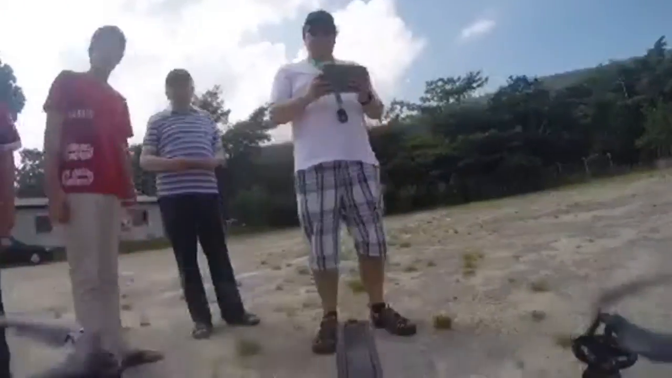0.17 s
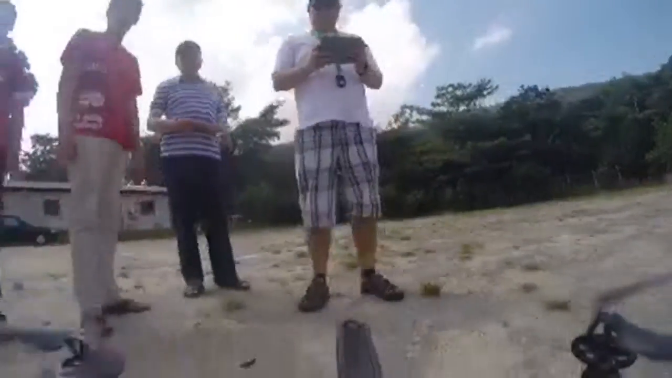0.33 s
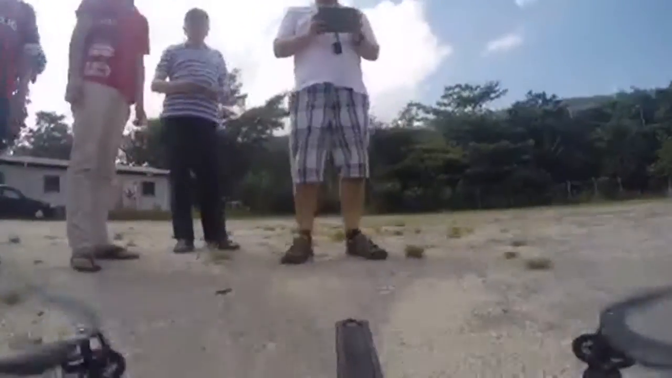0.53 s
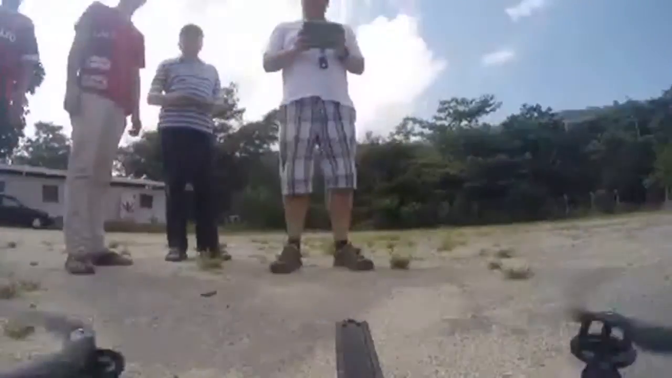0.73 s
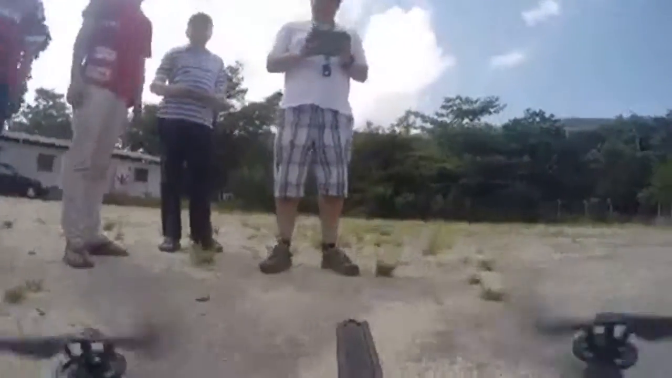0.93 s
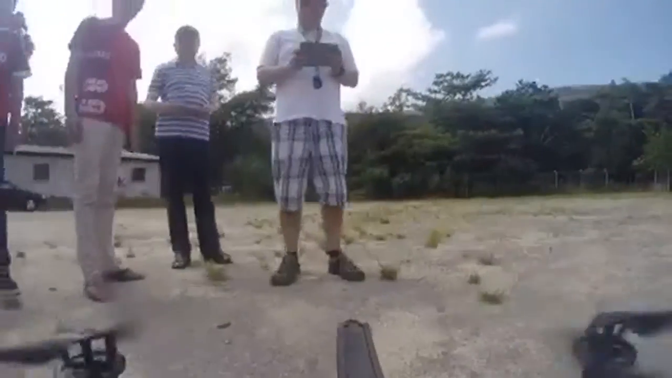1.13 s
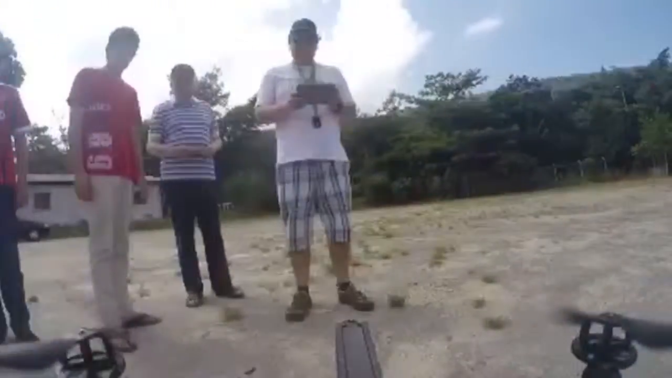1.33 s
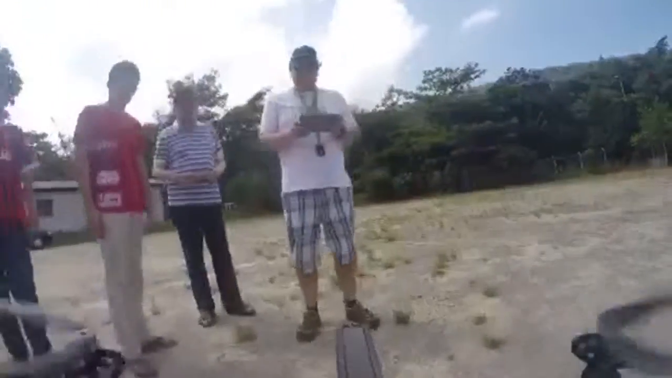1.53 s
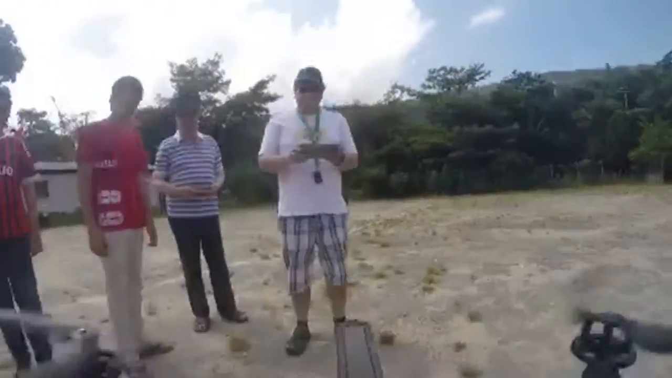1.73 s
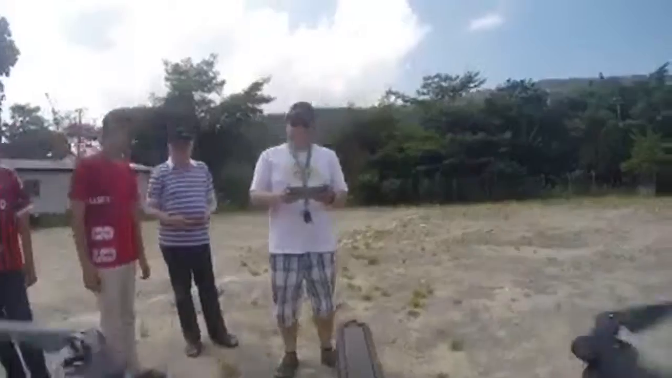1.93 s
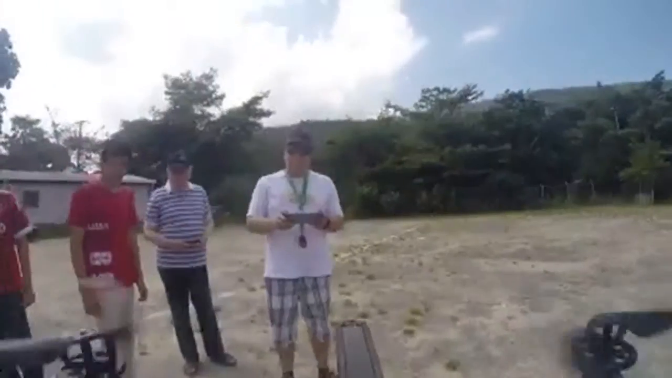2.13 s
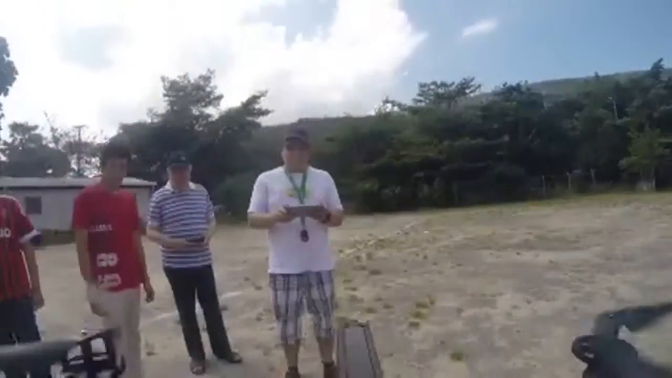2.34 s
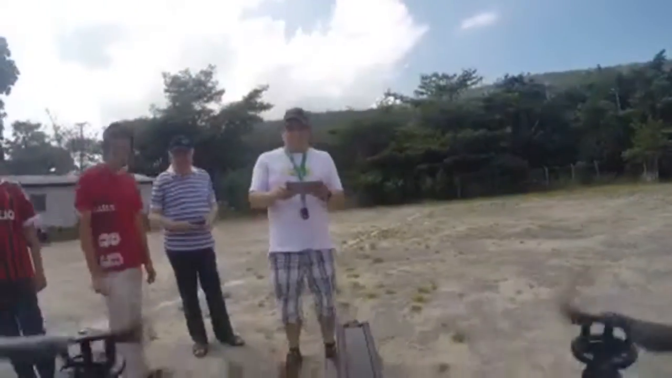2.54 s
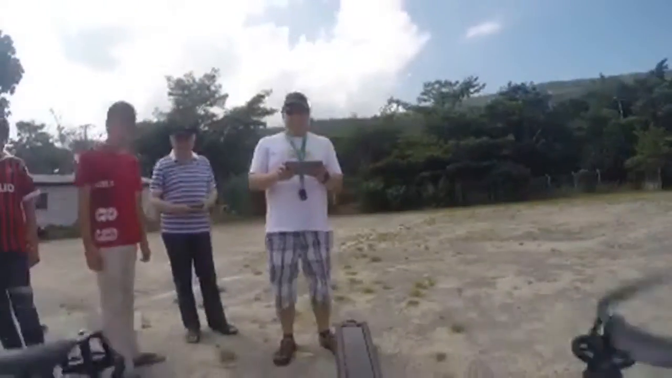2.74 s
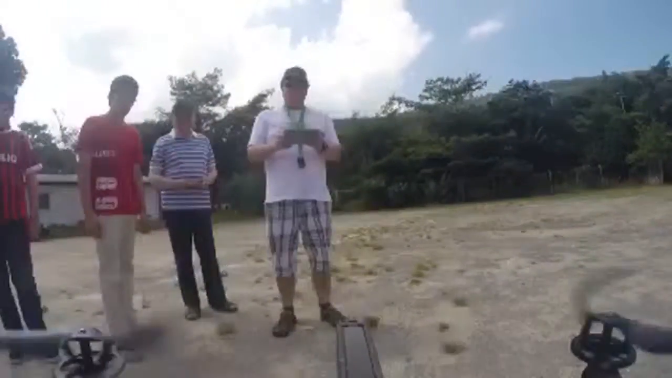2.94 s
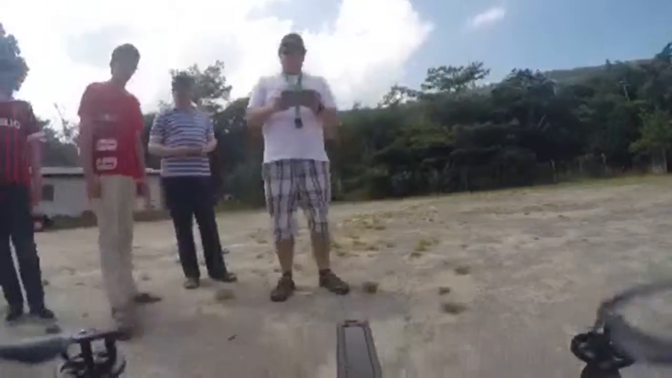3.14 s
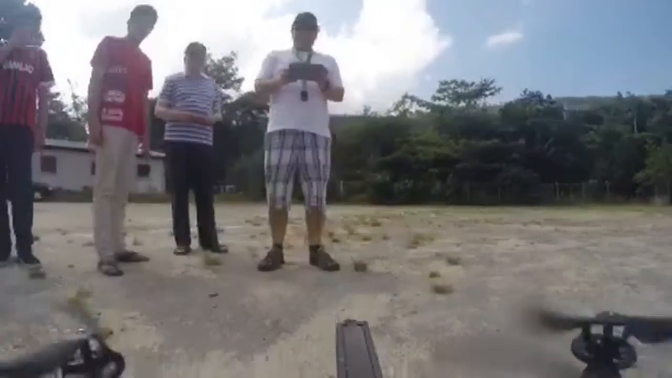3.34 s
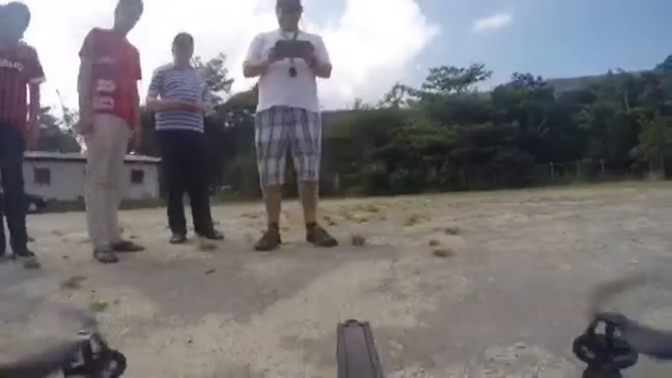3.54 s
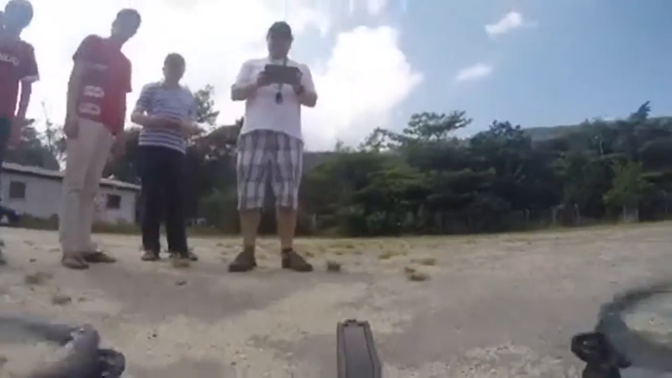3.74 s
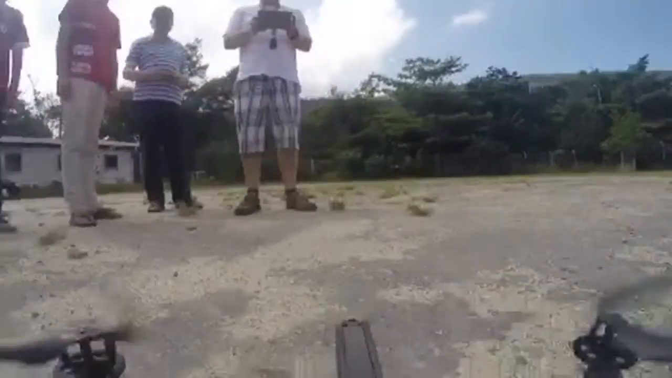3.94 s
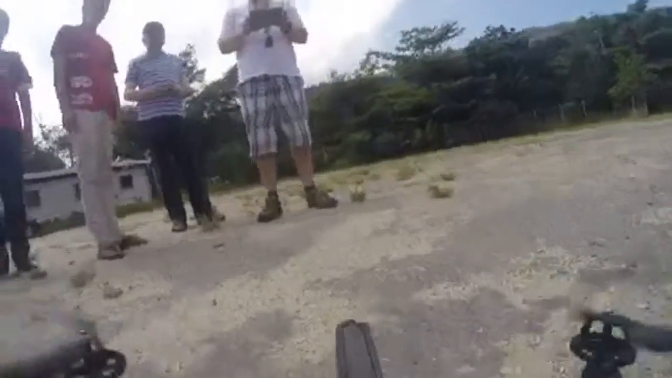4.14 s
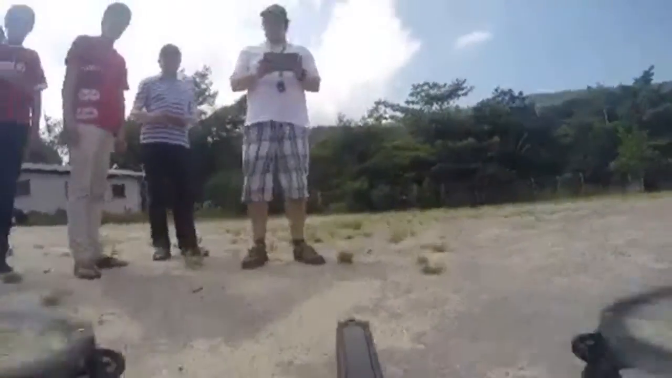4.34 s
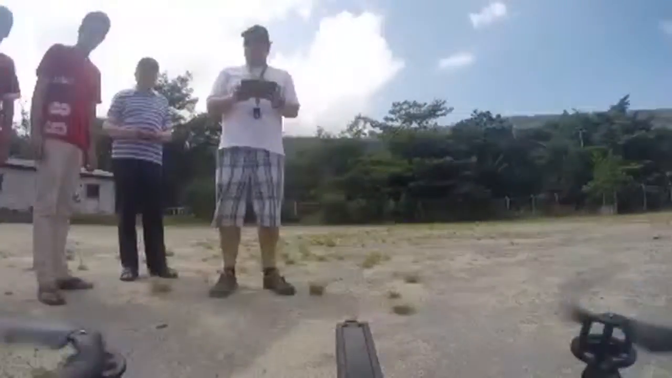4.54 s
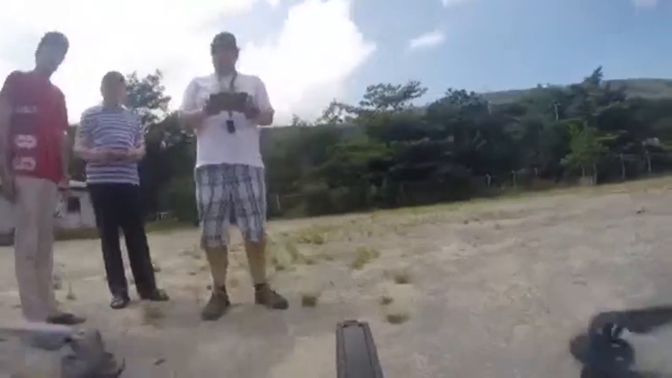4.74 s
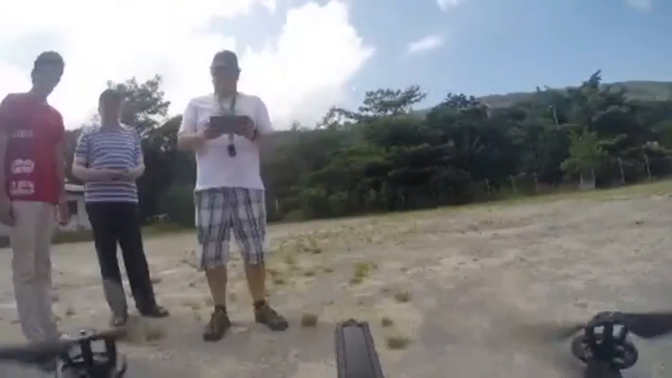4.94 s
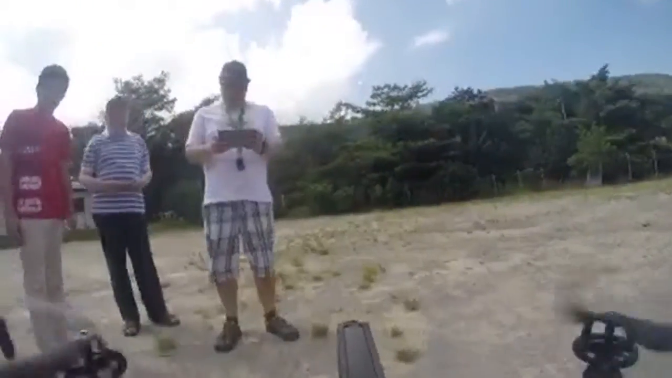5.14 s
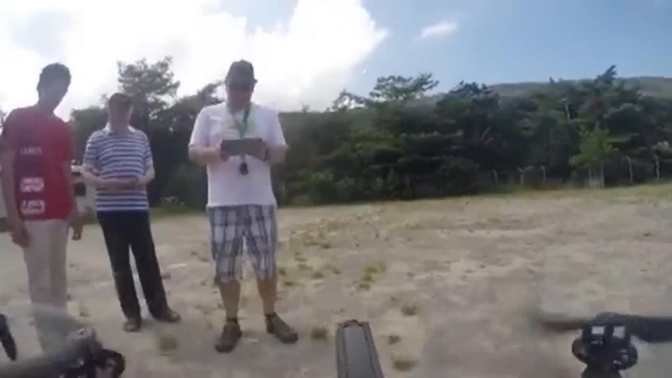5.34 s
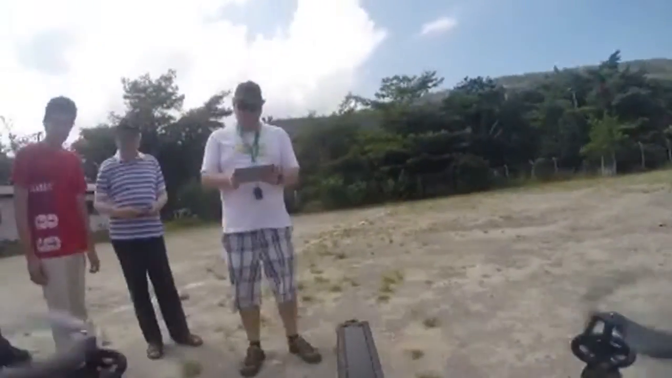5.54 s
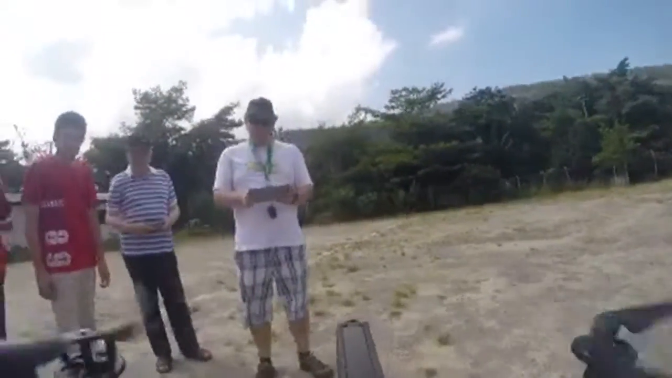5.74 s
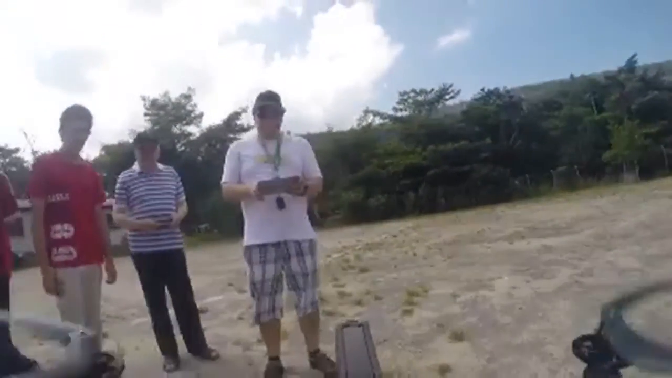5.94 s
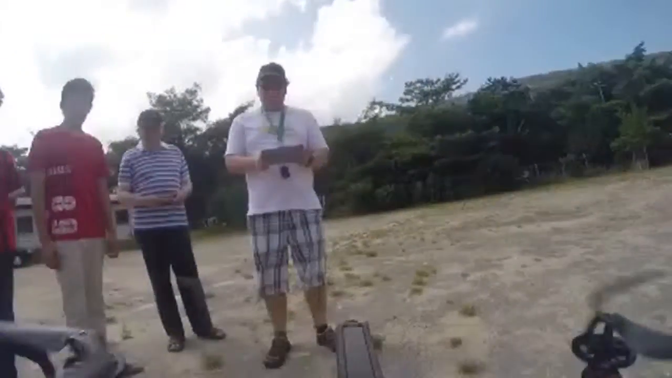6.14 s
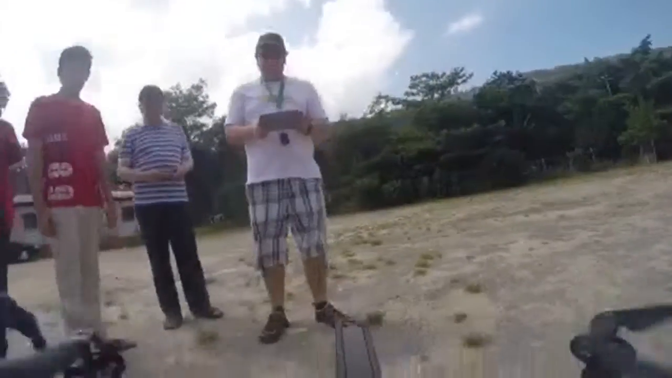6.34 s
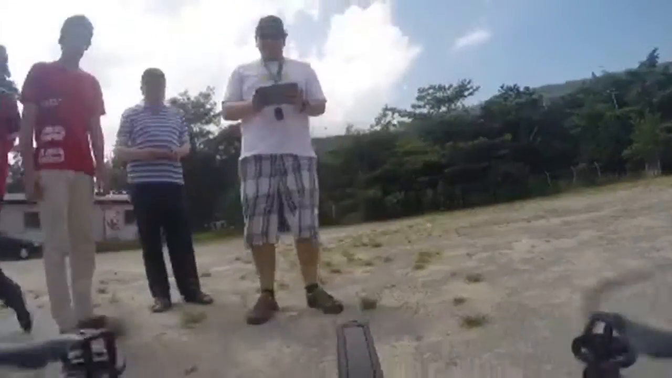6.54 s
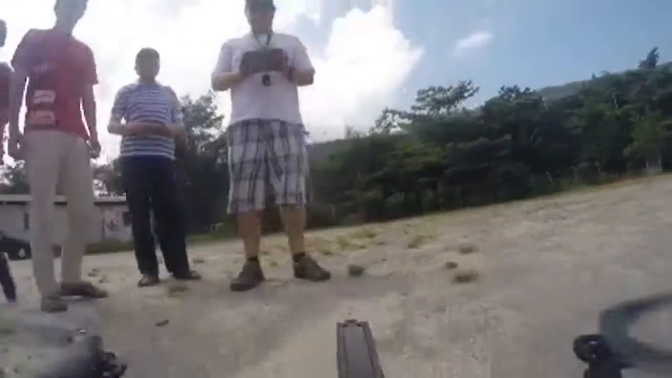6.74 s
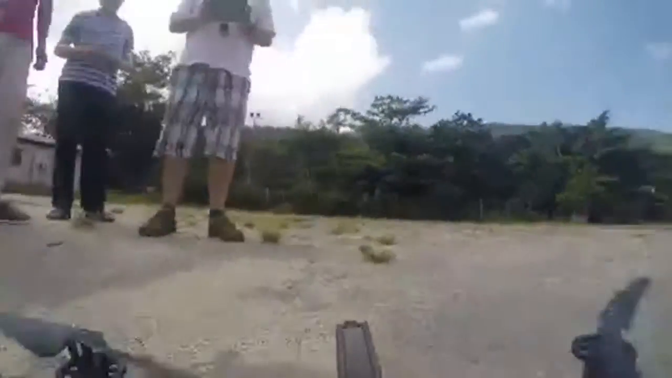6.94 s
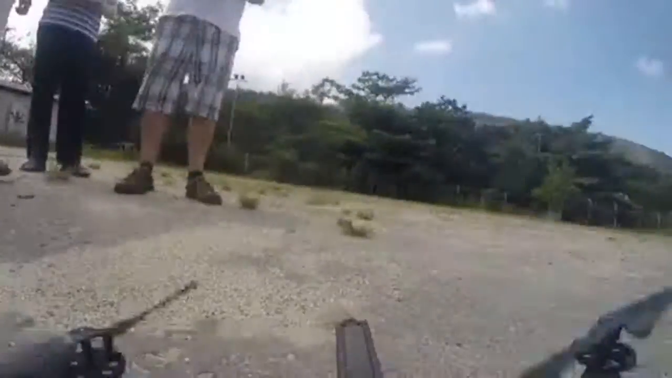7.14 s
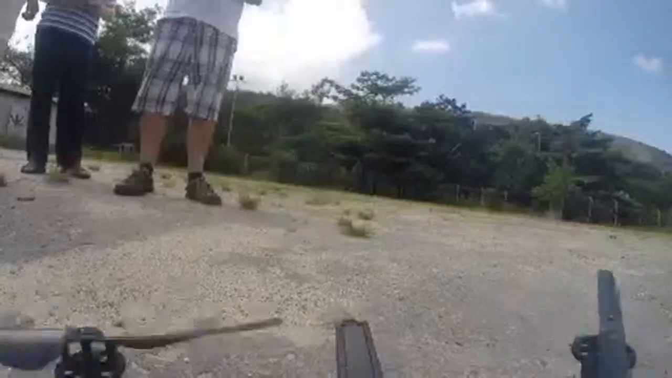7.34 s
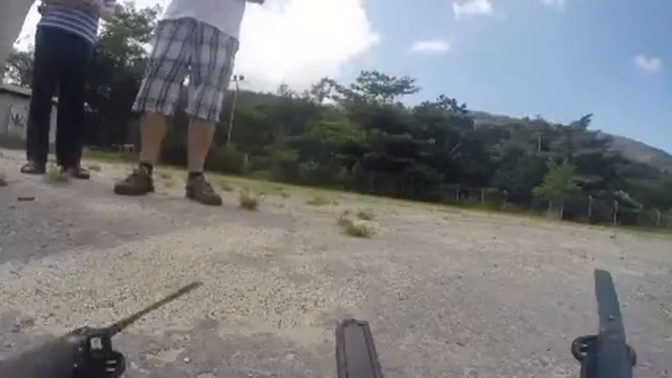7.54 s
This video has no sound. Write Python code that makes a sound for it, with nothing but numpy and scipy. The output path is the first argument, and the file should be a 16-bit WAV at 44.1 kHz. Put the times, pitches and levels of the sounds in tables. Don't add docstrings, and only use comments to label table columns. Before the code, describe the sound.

A small quadcopter's motors drone and beat very close up with gear whine and airy hiss, then it bumps down twice and its propellers flap to a stop.

```python
import sys
import numpy as np
from scipy import signal
from scipy.fft import rfft, irfft, next_fast_len
from scipy.io import wavfile

SR = 44100
rng = np.random.default_rng(int(sys.argv[2]) if len(sys.argv) > 2 else 0)


def unload_audio(sound):
    columns = np.transpose(np.atleast_2d(sound))
    steps = np.round(np.clip(columns, -1, 1) * 32767)
    wavfile.write(sys.argv[1], SR, steps.astype(np.int16))


def gain_from_db(level_db):
    decades = np.asarray(level_db, float) / 20
    return 10 ** decades


N = 339129
TIME = np.arange(N) / SR
STEP = 64
CUT_S = 6.915


def evened(x):
    return x / np.sqrt(np.mean(x ** 2) + 1e-20)


def curves(rows):
    s, *columns = np.transpose(rows)
    return [np.interp(TIME, s, c) for c in columns]


def colour(x, points):
    f, db = np.transpose(points)
    size = next_fast_len(N)
    hz = np.arange(size // 2 + 1) * SR / size
    gain = gain_from_db(np.interp(np.log(hz + 1), np.log(f + 1), db, -90, -90))
    return evened(irfft(rfft(x, size) * gain, size)[:N])


def drift(hz):
    size = next_fast_len(N)
    f = np.arange(size // 2 + 1) * SR / size
    spectrum = rfft(rng.standard_normal(size)) / (1 + (f / hz) ** 4)
    return evened(irfft(spectrum, size)[:N])


def resonate(x, hz, width):
    return signal.lfilter(*signal.iirpeak(hz, hz / width, SR), x)


def resonate_twice(x, hz, width, second_width):
    return resonate(resonate(x, hz, width), hz, second_width)


def filtered(x, order, hz, kind):
    return signal.sosfilt(signal.butter(order, hz, kind, fs=SR, output="sos"), x)


def add_at(out, s, sound):
    part = out[round(s * SR):][:len(sound)]
    part += sound[:len(part)]


def powered():
    return np.clip((CUT_S - TIME) / 0.0061, 0, 1)


# (frequency [Hz], level [dB])
BOARD_WHINE = [(10998, -84)]


def board(start_s=7.13):
    whine = sum(np.sqrt(2) * gain_from_db(db) * np.sin(2 * np.pi * hz * TIME) for hz, db in BOARD_WHINE)
    self_noise = colour(rng.standard_normal(N), [(300, -7.5), (1000, 14.0), (5000, -5), (11000, -18.5),
                                                 (12500, -31.5), (15500, -28)])
    return whine * np.clip((TIME - start_s) / .05, 0, 1) + gain_from_db(-60.5) * self_noise


# (time [s], pitch [Hz], level [dB])
FAR_WHINE = [(0, 9690, -68), (.2, 10320, -65.5), (.65, 10300, -67), (.8, 9240, -90), (1.0, 9560, -65),
             (1.75, 9850, -61.5), (1.9, 9700, -70), (1.98, 6500, -58), (2.1, 7010, -63), (2.6, 8630, -67.5),
             (3.3, 10470, -67), (3.8, 9380, -73), (4.15, 10270, -63), (4.5, 9050, -70.5), (5.7, 8700, -69),
             (5.78, 5200, -68), (5.85, 8366, -66), (6.91, 9100, -69.5)]


def far_whine():
    hz, db = curves(FAR_WHINE)
    waver = 1 + 0.015 * drift(9) + 0.018 * drift(400)
    tone = np.sin(2 * np.pi * np.cumsum(hz * waver) / SR)
    return np.sqrt(2) * gain_from_db(db + 2.0 * drift(30)) * tone * powered()


# (time [s], peak level [dB], ring [Hz])
SETTLING_TICKS = [(6.94, -47, 3917), (7.014, -56, 9500), (7.0434, -48, 5188), (7.0763, -59, 9070),
                  (7.114, -50, 4500), (7.2324, -52, 3700), (7.5584, -37, 3800)]
# (time [s], peak level [dB])
BLADE_PUFFS = [(7.015, -19), (7.19, -30), (7.253, -19.5), (7.333, -34.5), (7.423, -25.5), (7.464, -24),
               (7.506, -25), (7.551, -26), (7.602, -37.5), (7.669, -32.5)]


def settling():
    out, t = np.zeros(N), np.arange(SR // 20) / SR
    for s, db, hz in SETTLING_TICKS:
        ring = resonate_twice(rng.standard_normal(len(t)), hz, hz / 3.5, hz / 3.5)
        add_at(out, s, 1.8 * gain_from_db(db - 60 * t / .012) * ring)
    peak_s = 0.01
    swell = t / peak_s * np.exp(1 - t / peak_s) * (1 - 20 * t)
    for s, db in BLADE_PUFFS:
        puff = evened(filtered(rng.standard_normal(len(t)), 3, (150, 400), "band"))
        add_at(out, s, .5 * gain_from_db(db) * puff * swell)
    return out


# (frequency [Hz], width [Hz], level [dB])
CASE_MODES = [(1334, 710, -3.5), (1937, 530, -2), (2327, 160, 5), (13600, 600, -39.5)]
# (time [s], peak level [dB], hull bounce [Hz], t60 [s], crack level [dB])
TOUCHDOWNS = [
    (6.902, -5.5, 41, 0.32, -21),
    (7.092, -3.5, 40, 0.27, -16.5),
]


def landing():
    out, t = np.zeros(N), np.arange(SR // 2) / SR
    for s, db, hz, t60, crack_db in TOUCHDOWNS:
        bounce = -np.sin(2 * np.pi * hz * t) * gain_from_db(db - 60 * t / t60) * (1 - np.exp(-t / 0.0048))
        burst = rng.standard_normal(len(t)) * gain_from_db(crack_db - 60 * t / 0.11) * (1 - np.exp(-t / 0.00142))
        crack = filtered(burst, 2, [150, 1100], "band")
        ring = sum(resonate_twice(burst, f, w, 2 * w) for f, w, _ in CASE_MODES[:3])
        add_at(out, s, bounce + crack + gain_from_db(-10) * ring)
    return out


# (time [s], low flutter level [dB])
COASTING_LEVEL = [(6.93, -19), (6.99, -26.5), (7.03, -18), (7.06, -23.5), (7.11, -18), (7.22, -25),
                  (7.26, -23), (7.31, -23), (7.68, -38)]
# (frequency [Hz], level per Hz [dB])
FLAP_SPECTRUM = [(18, -31), (30, 0), (49, -7.5), (81, 1.5), (178, -5), (233, -10.5), (265, -24), (468, -19),
                 (900, -44.5), (1170, -75), (1980, -120)]


def coasting():
    level_db, = curves(COASTING_LEVEL)
    passes_hz = 75 * np.exp(-np.maximum(TIME - CUT_S, 0) / 1.78)
    uneven_hz = passes_hz * (1 + 0.1855 * drift(12.1))
    passes = np.exp(0.6 * np.cos(2 * np.pi * np.cumsum(uneven_hz) / SR))
    flaps = colour(rng.standard_normal(N) * passes, FLAP_SPECTRUM)
    return gain_from_db(level_db - 1.5) * flaps * (1 - powered())


# (time [s], peak level [dB])
SLAPS = [(.21, -43), (.73, -19.5), (1.27, -42), (1.67, -35.5), (1.95, -29), (3.98, -28.5), (4.3, -31),
         (4.73, -36), (5.22, -35.5), (5.85, -31), (6.2, -40), (6.65, -39), (6.9, -29)]


def buffeting():
    t = np.arange(0, N, STEP) / SR
    build_db_per_s, ebb_db_per_s, calm_db = 147, 69, -45.5
    db = np.max([peak_db - np.maximum(build_db_per_s * (s - t), ebb_db_per_s * (t - s))
                 for s, peak_db in SLAPS], axis=0)
    return np.interp(TIME, t, db.clip(calm_db))


# (time [s], hiss rise [dB], hull drumming rise [dB], half width [s])
WASH_GUSTS = [(0.488, 5, 7, 0.077), (.66, 4.5, 6, .06), (.88, 3.5, 7.5, 0.039), (1.07, 4, 6, 0.047),
              (1.24, 5.5, 5.5, 0.062), (1.4, 4.5, 9, 0.046), (1.709, 6.5, 6, 0.088), (1.96, 6.5, 9, 0.069),
              (2.211, 8.5, 9.5, 0.02), (2.34, 2, 1.5, 0.042), (2.5, 3.5, 0, 0.039), (2.68, 2.5, 6, 0.051),
              (2.85, 4, 7, 0.036), (3.22, 2.5, -6, 0.11), (3.41, 4, -0.5, 0.019), (3.65, 2.5, 0.5, 0.068),
              (4.05, 4.5, 7, 0.12), (4.3, 4, 5, 0.12), (4.53, 6, 8, 0.043), (4.681, 7.5, 10, 0.047),
              (4.85, 4, 1.5, 0.028), (5.06, 3.5, 3, 0.033), (5.2, 4, 8, 0.043), (5.36, 5.5, 10.5, 0.026),
              (5.62, 1.5, 5, 0.037), (5.87, 4, 13, 0.02), (6.15, 2.5, 5.5, 0.052), (6.32, 2.5, 6.5, 0.028),
              (6.63, 4.5, 13, 0.065), (6.85, 3.5, 6, 0.025)]


def gusting(calm_db, column):
    t = np.arange(0, N, STEP) / SR
    db = calm_db + sum(row[column] * np.exp(-((t - row[0]) / row[3]) ** 2) for row in WASH_GUSTS)
    return np.interp(TIME, t, db)


# (frequency [Hz], level per Hz [dB])
DRUM_SPECTRUM = [(18, -41), (30, -20), (59, -4), (144, -1), (188, -6), (296, -10), (353, -9), (663, -11.5),
                 (735, -29), (1000, -56.5), (1300, -75), (2200, -120)]


def hull():
    lump_db, drum_db = buffeting(), gusting(-25, column=2)
    lumps = colour(rng.standard_normal(N), [(12, -22.5), (25, -3.5), (42, -6.0), (58, -25.5)])
    drum = colour(rng.standard_normal(N) * gain_from_db(2.2 * drift(25)), DRUM_SPECTRUM)
    return (gain_from_db(lump_db - 2.0) * lumps + gain_from_db(drum_db - 2.5) * drum) * powered()


# (frequency [Hz], level per Hz [dB])
AIR_SPECTRUM = [(440, -22), (750, 3), (942, -1.5), (1230, 2.5), (1910, 0.5), (2150, -3), (2370, -4),
                (2910, -4.5), (3610, -16.5), (5480, -19.5), (5990, -21.5), (10100, -31), (12200, -30),
                (13800, -36.5), (15500, -34.5)]
# (frequency [Hz], level [dB])
MIC_TREBLE = [(3000, 0.5), (11200, -1), (11700, -8.5), (12800, -5.5), (13500, -1.5), (14600, -2),
              (15400, -12)]
# (frequency [Hz], width [Hz], level [dB])
SHELL_MODES = [(4600, 130, -2), (7200, 500, -7.5), (7960, 380, -10)]


def hiss(chop, knocks):
    on, off = powered(), 1 - powered()
    calm_db = -41.5
    fading_db = -44 - 38 * np.maximum(TIME - CUT_S - .2, 0)
    level_db = gusting(calm_db, column=1) * on + fading_db * off
    bright_db = -10.5 + 0.34 * (level_db + 37) - 10.8 * off

    torn = rng.standard_normal(N) * (1.38 + 0.53 * chop) * gain_from_db(1.18 * drift(46))
    rattles = (rng.random(N) < 500 / SR) * gain_from_db(2.1 * np.minimum(rng.exponential(1, N), 4))
    rattles = rattles * rng.choice([-1, 1], N)
    air = colour(evened(torn) + 0.21 * evened(rattles * (.2 + chop)), AIR_SPECTRUM)

    top = filtered(air, 4, 3800, "high")
    hz, width, db = CASE_MODES[3]
    top = colour(top + gain_from_db(db + 30) * resonate(top, hz, width), MIC_TREBLE)
    shell = evened(sum(gain_from_db(db) * resonate_twice(knocks, hz, width, width) for hz, width, db in SHELL_MODES))
    top = top + 0.26 * gain_from_db(0.3 * (level_db - calm_db)) * shell

    ring = sum(gain_from_db(db + 12.0) * resonate(air, hz, width) for hz, width, db in CASE_MODES[:3])
    body = evened(filtered(air + ring, 4, 3800, "low"))
    bare = evened(sum(resonate_twice(air, hz, width / 2, width / 2) for hz, width, _ in CASE_MODES[:2]))
    body = body * on + (0.59 * bare + 0.44 * body) * off
    return gain_from_db(level_db) * (body + gain_from_db(bright_db) * top)


# (time [s], shaft shake [dB], blade hum [dB])
MOUNT_GRIP = [(0, 1.3, -2), (.4, -2.3, 2.5), (.8, -2.5, -2), (1.2, 1.5, -1), (1.6, 3, -1.6), (1.9, 4, 0.6),
              (2.3, -3.2, 0.5), (2.75, 0.2, -1), (3.1, 0, 0.6), (3.5, 2.2, -0.7), (3.9, 1.3, -2.1),
              (4.4, 2.1, -0.4), (4.9, 1.9, -0.5), (5.3, 0.3, 0.3), (5.7, -0.5, -1.7), (6.0, -1, 1.1),
              (6.4, -4, 1), (6.91, -0.5, 1.2)]


def arm(speeds, reach, hunt_hz):
    (speed,), (shake_db, hum_db) = curves(speeds), curves(MOUNT_GRIP)
    slack_hz = np.clip(77.5 - speed, 0, 6)
    speed = speed + hunt_hz * drift(6) + .2 * slack_hz * drift(14)
    return speed, reach[0] + shake_db + 2 * drift(4.6), reach[1] + hum_db + 2 * drift(3.8)


ORDERS = 3, 4, 6, 8, 8.625, 69
# (frequency [Hz], level [dB])
FRAME_PATH = [(150, -6.5), (195, -1.5), (235, 4), (265, -2), (305, 1.5), (335, -11.5), (430, 2), (560, 2.5),
              (635, -3), (664, 3), (720, -7), (4200, 0.5), (4600, 8), (4780, 1.5), (4950, 7), (5150, -4),
              (5320, 9.5)]


def rotor(arm, orders_db, flutter):
    speed, shake_db, hum_db = arm
    turns = 2 * np.pi * np.cumsum(speed) / SR
    play_hz = (speed * flutter + .0004 * (78 - speed) * speed / 2) * drift(40)
    wobble = 2 * np.pi * np.cumsum(play_hz) / SR
    low = gain_from_db(shake_db) * np.sin(turns) + gain_from_db(hum_db) * np.sin(2 * turns + 1.3)
    frame_hz, frame_db = np.transpose(FRAME_PATH)
    sway_db = 2.2 * drift(8)
    high = np.zeros(N)
    for k, db in zip(ORDERS, orders_db):
        level_db = db + np.interp(k * speed, frame_hz, frame_db)
        if k < 9:
            level_db = level_db + np.roll(sway_db, round(k * SR / 7))
        high += gain_from_db(level_db) * np.sin(k * (turns + wobble * k / 69) + k * k)
    chop = np.exp(2.1 * (np.cos(2 * turns) - 1)) * (1 + 0.7 * np.cos(turns))
    knock_db = 4.2 * drift(21) + 6.0 * rng.standard_normal(N)
    knocks = np.diff(turns // (2 * np.pi), prepend=0) * gain_from_db(knock_db)
    return np.array([np.sqrt(2) * (low + high), chop, knocks]) * powered()


# (time [s], speed [Hz])
FAST_ROTOR = [(0, 77.4), (.32, 75.9), (.38, 73.5), (.5, 76.3), (.73, 78.6), (.8, 74.5), (.9, 76.7),
              (1.92, 77.4), (2.05, 63.5), (2.17, 66.5), (2.37, 67), (2.5, 71.3), (2.95, 72.5), (3.25, 77),
              (5.6, 77.3), (5.79, 65), (5.95, 72.3), (6.91, 72.3)]
MIDDLE_ROTOR = [(0, 72.47), (0.351, 69.73), (0.648, 72.95), (1.3, 70.3), (1.55, 73.7), (1.9, 72.4),
                (2.048, 59.78), (2.4, 64.33), (2.8, 66.16), (3.251, 73.6), (3.852, 73.28), (4.1, 71.35),
                (4.85, 72.42), (5.1, 68.87), (5.621, 70.87), (5.862, 59.02), (6.119, 66.57), (6.91, 66.45)]
SLOW_ROTOR = [(0, 67.03), (.6, 70.32), (.75, 62.12), (.88, 69.52), (1.3, 66.13), (1.88, 69.9),
              (2.001, 49.1), (2.4, 59.07), (2.85, 67.06), (3.852, 69), (4.0, 61.03), (4.202, 67.05),
              (4.749, 63.08), (5.0, 66.95), (5.55, 61.87), (5.85, 49.02), (6.049, 62.14), (6.909, 64.5)]
# (shaft shake [dB], blade-pass hum [dB])
ROTOR_REACH = [
    (-21.5, -34.5),
    (-22, -16.5),
    (-28, -19),
]
# (level [dB], ..)
ROTOR_ORDERS = [(-35.5, -31.5, -38, -55, -39, -64.5), (-29, -27.5, -31.5, -44, -43, -68),
                (-38.5, -31, -59, -40, -43.5, -67.5)]
ROTOR_FLUTTER = 0.0027, 0.016, .012


def scene():
    hunts_hz = .25, 1.1, 1.6
    speeds = FAST_ROTOR, MIDDLE_ROTOR, SLOW_ROTOR
    arms = [arm(*row) for row in zip(speeds, ROTOR_REACH, hunts_hz)]
    tones, chop, knocks = sum(rotor(*row) for row in zip(arms, ROTOR_ORDERS, ROTOR_FLUTTER))
    after = coasting() + landing() + settling() + board()
    return (tones + far_whine() + hull() + hiss(chop, knocks) + after)[None]


def top_cut(x):
    return signal.sosfilt(signal.butter(12, 15630, fs=SR, output="sos"), x)


def record(dry):
    start = np.sin(np.pi / 2 * np.clip(TIME / .004, 0, 1)) ** 2
    return top_cut(1.15 * np.tanh(dry * start / 1.206))


dry = scene()
out = record(dry)
unload_audio(out)
```